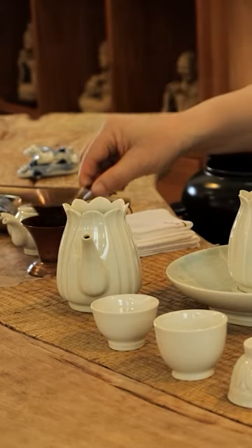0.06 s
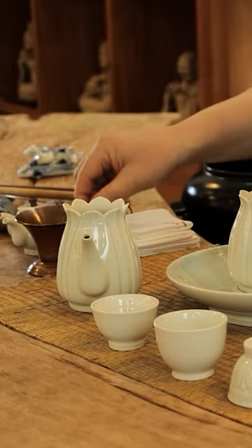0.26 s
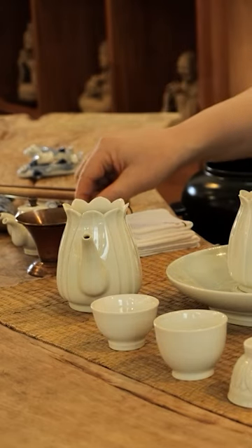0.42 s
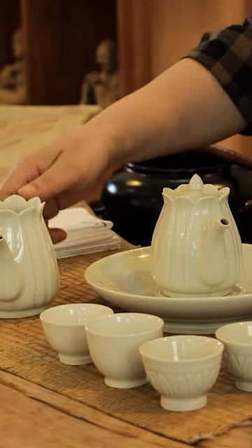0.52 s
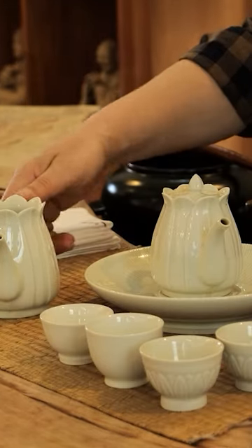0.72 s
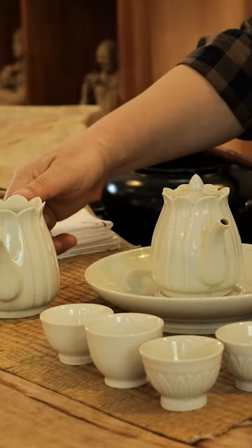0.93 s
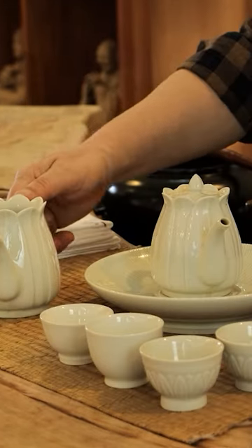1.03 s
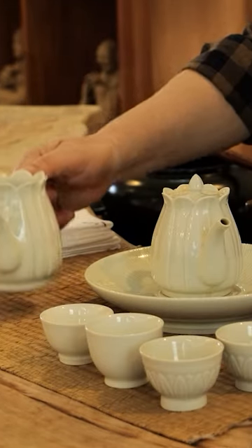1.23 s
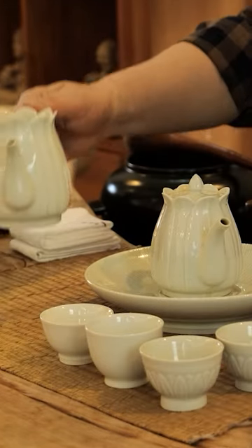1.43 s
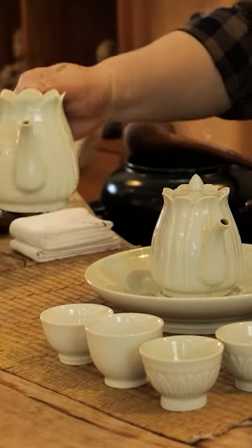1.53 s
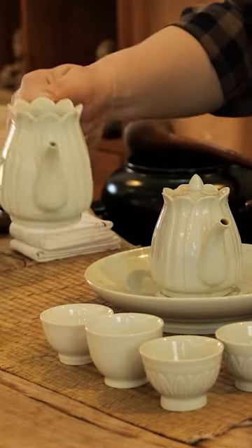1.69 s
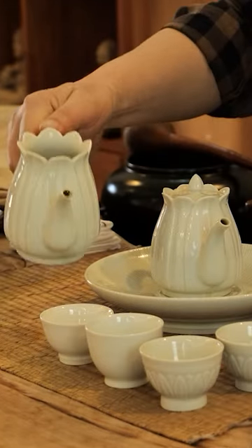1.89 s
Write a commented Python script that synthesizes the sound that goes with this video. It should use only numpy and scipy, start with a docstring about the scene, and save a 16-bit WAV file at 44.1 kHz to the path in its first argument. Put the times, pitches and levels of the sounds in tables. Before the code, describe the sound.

A tea strainer clinks twice onto its ceramic holder and rattles briefly in a quiet room.

```python
"""In a quiet room with a low hum, a tea strainer is set on its ceramic holder: two bright clinks,
then a short rattle as it rocks into its seat. Each contact knocks, grates on the glaze and rings
the teaware; the table top and the small room answer. Afterwards a hand brushes a pot and lifts it,
heard as soft rustles and small scrapes, while the hum swells toward the end."""
import sys
import numpy as np
from scipy import signal
from scipy.fft import rfft, irfft
from scipy.io import wavfile
from scipy.ndimage import uniform_filter1d

SR = 44100
rng = np.random.default_rng(int(sys.argv[2]) if len(sys.argv) > 2 else 0)


def transcribe(signal):
    """Save signal, clipped to [-1, 1], as a 16-bit WAV file at the path in sys.argv[1]."""
    frames = np.atleast_2d(signal).T
    limited = np.clip(frames, -1, 1)
    pcm = np.round(limited * 32767).astype(np.int16)
    wavfile.write(sys.argv[1], SR, pcm)


N = 85995

RING_RISE_S, CHOKE_T60_S, GRIT_T60_S = 0.0012, 0.13, 0.03
SHIMMER_LOW_HZ, SHIMMER_HIGH_HZ, SHIMMER_DB, SHIMMER_T60_S = 2503, 15020, -13, 0.16
SCATTER_DB, SCATTER_RISE_S, SCATTER_T60_S = -8.5, 0.002, 0.053

# Hits of strainer on holder, levels relative: start_s, spot, knock_db, knock_hz, ring_db, grit_db
CONTACTS = [(0.2321, "rim", -8.5, 2010, -46.5, -39), (.2368, "rim", -18.5, 2150, -54, -43.5),
            (0.2413, "rim", -26, 1900, -50.5, -40), (0.2761, "side", -9, 1610, -49, -32),
            (0.2776, "side", -26, 2840, -57.5, -37.5), (.2843, "side", -24, 1770, -57.5, -43.5),
            (0.3609, "seat", -22, 2020, -44.5, -33.5), (.3680, "seat", -25.5, 1900, -63, -42),
            (0.382, "seat", -28.5, 1490, -56, -40), (0.3859, "seat", -21, 1290, -49, -38.5),
            (0.3929, "rock", -22, 1850, -57, -62), (0.4486, "seat", -32, 1610, -72, -73),
            (0.4503, "seat", -29, 1370, -75.5, -68), (0.4638, "rock", -28.5, 1965, -57, -49),
            (0.4802, "rock", -35, 2130, -60, -58), (0.4917, "seat", -31, 1017, -87, -63)]
# Character of each spot, by name: mode_column (0 rim, 1 side, 2 seat), table_push_db, knock_cycles
SPOTS = {"rim": (0, 0, 0.67), "side": (1, -4, 0.52), "seat": (2, 7, .62), "rock": (2, 0.87, 2.2)}
# Ring of strainer and holder, by spot struck: pitch_hz, t60_s, rim_db, side_db, seat_db
WARE_MODES = [(1098, 0.08, -26, -5, 6), (1275, 0.12, -10, 17, -8), (1394, 0.08, 14, 15, -18),
              (1749, 0.05, -5, -6, 12), (1875, 0.045, 15, 3, 17), (1990, 0.06, 8, -7, -1),
              (2200, 0.07, 5, 5, 0), (2309, 0.1, 2, 10, -5), (2444, 0.05, 10, 5, -5),
              (2939, 0.06, -10, 5, -9), (3343, 0.1, 3, 14, 7), (3590, 0.08, 9, 2, -16),
              (4152, 0.15, -1, -2, -25), (5022, 0.09, -29, -1, -23), (5205, 0.11, -4, 9, 4),
              (5248, 0.07, 3, 12, 0), (5334, 0.08, 8, -6, -9), (6411, 0.08, 6, 8, -34),
              (6567, 0.09, 11, 4, -10), (6621, 0.06, 5, 13, -23), (6745, 0.06, 1, 12, -10),
              (7445, 0.07, -26, 4, -22), (8091, 0.11, 2, 0, -11), (8455, 0.08, -9, 7, -11),
              (9190, 0.08, -12, 3, -10), (9743, 0.09, -14, 1, -28), (10100, 0.06, -38, -6, -13),
              (10890, 0.06, -27, -3, -16), (11150, 0.06, -17, 3, -8), (11740, 0.07, -14, 5, -21),
              (11794, 0.11, 2, 4, -21), (13615, 0.07, -9, -10, -23), (14490, 0.07, -12, -2, -18)]
# Moments when the strainer lies against the holder and chokes its ring: start_s
RESTS = [.251, .3, .41, .492]
# Tone of the grating glaze: frequency_hz, gain_db
GRIT_SPECTRUM = [(80, -47), (400, 7), (1000, 2.5), (1800, 4.5), (3200, -5), (5500, -12), (9000, -9.5),
                 (12500, -19), (16000, -19)]
def strainer(t):
    """Each contact knocks, grates, shakes the table and rings the ware until a rest chokes it."""
    out, t = np.zeros(N), t[:SR // 2]
    modes = np.array(WARE_MODES)
    hz, t60 = modes[:, :1], modes[:, 1:2]
    rings = np.sin(2 * np.pi * hz * t) * fade(t, t60) * (1 - np.exp(-t / RING_RISE_S))
    overtones = shimmer(t, count=70)
    table = table_top(t)
    for start, spot, knock_db, knock_hz, ring_db, grit_db in CONTACTS:
        column, push_db, cycles = SPOTS[spot]
        mode_db = modes[:, 2 + column]
        ring = undb(mode_db + ring_db) @ rings
        # The shimmer follows the mean level of the treble modes.
        shimmer_db = mode_db[hz[:, 0] > SHIMMER_LOW_HZ].mean() + ring_db + SHIMMER_DB
        ring += undb(shimmer_db) * rng.standard_normal(len(overtones)) @ overtones
        rest_s = min((s for s in RESTS if s > start), default=start)
        ring *= fade(np.maximum(start + t - rest_s, 0), CHOKE_T60_S)
        grit = undb(grit_db) * noise(GRIT_SPECTRUM)[:len(t)] * fade(t, GRIT_T60_S)
        blow = knock(t, knock_hz, cycles)
        impact = blow + scatter(blow, t) + undb(push_db) * table
        add(out, start, undb(knock_db) * impact / 2 + ring + grit)
    return out


def knock(t, hz, cycles):
    """The hard front of a clink: a heavily damped swing with no bass and a peak of 1."""
    age = t * hz / cycles
    swing = np.gradient(age ** 3 * np.exp(-2.5 * age) * np.sin(2 * np.pi * hz * t))
    return swing / np.abs(swing).max()


def shimmer(t, count):
    """Short overtones of the thin strainer at random pitches, weaker toward the top; one row each."""
    hz = rng.uniform(SHIMMER_LOW_HZ, SHIMMER_HIGH_HZ, (count, 1))
    return np.sin(2 * np.pi * hz * t) * fade(t, SHIMMER_T60_S) * np.sqrt(np.mean(hz) / hz)


def scatter(blow, t):
    """Nearby ware throws the knock back as a dense, brief smear."""
    reflections = burst(t, SCATTER_T60_S) * (1 - np.exp(-t / SCATTER_RISE_S))
    return undb(SCATTER_DB) * signal.fftconvolve(blow, reflections)[:len(t)]


# Body of the table top, relative to the knock before the spot's push: pitch_hz, t60_s, level_db
TABLE_MODES = [(245, 0.14, -49), (327, 0.15, -30.5), (492.6, 0.09, -30), (621, 0.096, -32.5),
               (794, 0.15, -31)]
def table_top(t):
    """The low modes of the table put a thump under each clink."""
    return sum(undb(db) * np.sin(2 * np.pi * hz * t) * fade(t, t60) for hz, t60, db in TABLE_MODES)


BRUSH_ROUGH_DB, TOUCH_RISE_SHARE = 3, 0.033  # the rise time is a share of the touch's t60
# Rustles as the hand moves and takes the pot: centre_s, width_s, level_db
BRUSHES = [(.05, 0.11, -70.5), (0.931, 0.071, -70), (1.09, 0.027, -68), (1.128, 0.014, -66),
           (1.25, 0.018, -71.5), (1.43, .04, -74)]
# Tone of the rustle: frequency_hz, gain_db
BRUSH_SPECTRUM = [(200, 9), (1200, -0.5), (2600, -0.5), (5000, -9.5), (11000, -15), (16000, -20)]
# Fingers bump and scrape the ware: start_s, level_db, pitch_hz, bandwidth_hz, t60_s
TOUCHES = [(0.108, -68, 8660, 4000, 0.026), (1.049, -54, 2120, 1600, 0.024), (1.112, -54, 283, 109, 0.14),
           (1.233, -72, 4500, 895, 0.19), (1.408, -69.5, 4120, 220, 0.2), (1.52, -69, 2440, 190, 0.29),
           (1.751, -73, 2480, 190, .25)]
def hand(t):
    """Soft uneven brushing, and short scrapes that each stir one resonance of the ware."""
    swell = sum(undb(db) * np.exp(-.5 * ((t - at) / width) ** 2) for at, width, db in BRUSHES)
    out = swell * noise(BRUSH_SPECTRUM) * undb(BRUSH_ROUGH_DB * walk(rate_hz=250))
    for start, db, hz, bandwidth, t60 in TOUCHES:
        b, a = signal.iirpeak(hz, hz / bandwidth, fs=SR)
        scrape = signal.lfilter(b, a, signal.lfilter(b, a, rng.standard_normal(N)))
        envelope = fade(t, t60) * (1 - np.exp(-t / (TOUCH_RISE_SHARE * t60)))
        add(out, start, undb(db) * scrape / scrape.std() * envelope)
    return out


ROOM_DELAY_S = 0.0049
# Bands of the room's tail: centre_hz, level_db, t60_s
ROOM_BANDS = [(152, 1, 0.49), (537, -4, 0.37), (1220, -11, 0.29), (2450, -15, 0.28), (6000, -14, 0.44),
              (16000, -12.5, 0.19)]
def room(x, t):
    """The small room adds a short tail that lasts longest in the bass."""
    log_hz = np.log(np.maximum(np.fft.rfftfreq(N, 1 / SR), 1))
    log_centres = np.log(np.array(ROOM_BANDS)[:, 0])
    spectrum = 0
    for (_, db, t60), band in zip(ROOM_BANDS, np.eye(len(ROOM_BANDS))):
        crossfade = np.sqrt(np.interp(log_hz, log_centres, band))
        spectrum = spectrum + undb(db) * rfft(burst(t, t60)) * crossfade
    tail = irfft(spectrum, N) * np.clip(t / ROOM_DELAY_S - 1, 0, 1)
    return x + signal.fftconvolve(x, tail[:SR // 2])[:N]


HUM_HZ, HUM_WAVER_SHARE, HUM_FLICKER_DB, HUM_OCTAVE_DB = 106.8, 0.0074, -1, -19.5
# Swell of the hum: time_s, level_db
HUM_SWELL = [(0, -67), (.6, -73.5), (.66, -64.5), (1.2, -63), (1.5, -59.5), (1.8, -55.5), (1.95, -56.5)]
def hum(t):
    """A low tone and its faint octave swell slowly, wavering a little in pitch and level."""
    hz = HUM_HZ * (1 + HUM_WAVER_SHARE * walk(rate_hz=8.2))
    phase = 2 * np.pi * np.cumsum(hz) / SR
    level_db = np.interp(t, *np.array(HUM_SWELL).T) + HUM_FLICKER_DB * walk(rate_hz=14)
    return np.sqrt(2) * undb(level_db) * (np.sin(phase) + undb(HUM_OCTAVE_DB) * np.sin(2 * phase))


AIR_DB = -58.5
# Tone of the quiet room: frequency_hz, gain_db
AIR_SPECTRUM = [(20, -8.5), (70, -20.5), (100, -12.5), (140, -16.5), (200, -11.5), (310, -13.5),
                (700, -24.5), (1000, -29), (1650, -32), (1900, -39.5), (2600, -38.5), (8000, -48.5),
                (15000, -53)]
def air():
    """A steady bed of dull room noise."""
    return noise(AIR_SPECTRUM) * undb(AIR_DB)


def undb(db):
    """Decibels to gain."""
    return 10 ** (np.asarray(db) / 20)


def noise(points):
    """Noise of rms 1, coloured by (frequency_hz, gain_db) points."""
    hz, db = np.array(points, float).T
    log_hz = np.log(np.maximum(np.fft.rfftfreq(N, 1 / SR), 1))
    gain = undb(np.interp(log_hz, np.log(hz), db))
    x = irfft(rfft(rng.standard_normal(N)) * gain, N)
    return x / x.std()


def walk(rate_hz):
    """Smooth random drift with a spread of 1."""
    hold = int(SR / rate_hz)
    steps = np.repeat(rng.standard_normal(N // hold + 1), hold)
    x = uniform_filter1d(uniform_filter1d(steps, hold), hold)[:N]
    return x / x.std()


def fade(t, t60):
    """Exponential decay, 60 dB down at t60."""
    return np.exp(-np.log(1000) * t / t60)


def burst(t, t60):
    """Decaying noise of unit energy."""
    return rng.standard_normal(len(t)) * fade(t, t60) * np.sqrt(2 * np.log(1000) / (t60 * SR))


def add(out, start_s, x):
    """Mix a sound in at a time."""
    i = int(start_s * SR)
    out[i:i + len(x)] += x[:N - i]


def scene():
    """Strainer and hand sound in the room, over the hum and the air."""
    t = np.arange(N) / SR
    return (room(strainer(t) + hand(t), t) + hum(t) + air())[None]


TOP_HZ = 16000
def record(dry):
    """A steep low-pass cuts the highest treble."""
    return signal.sosfilt(signal.ellip(10, .1, 70, TOP_HZ, fs=SR, output="sos"), dry)


dry = scene()
out = record(dry)
transcribe(out)
```